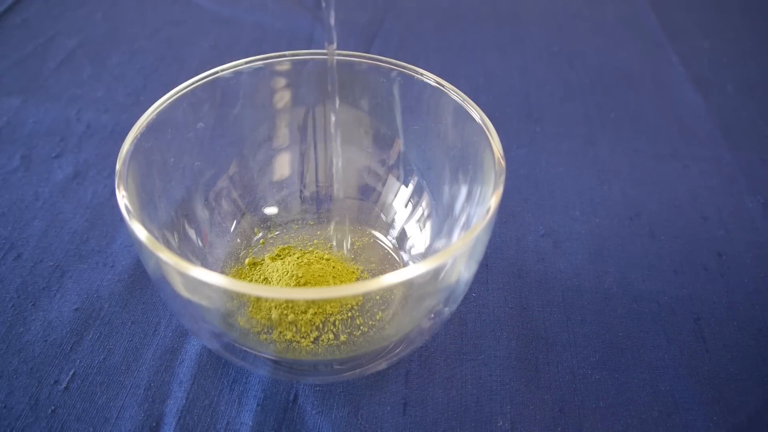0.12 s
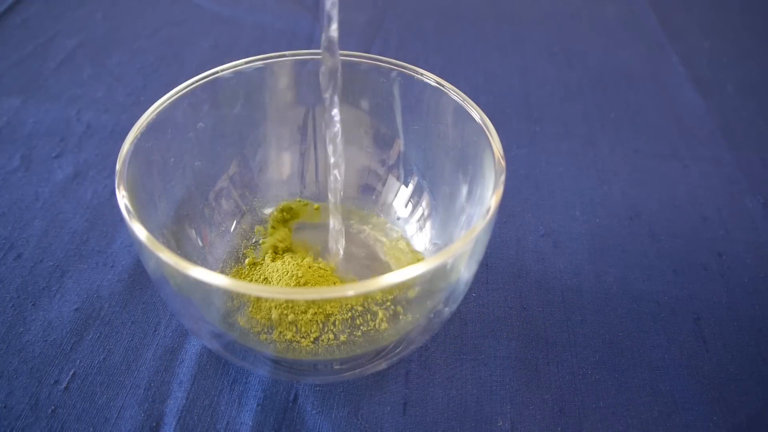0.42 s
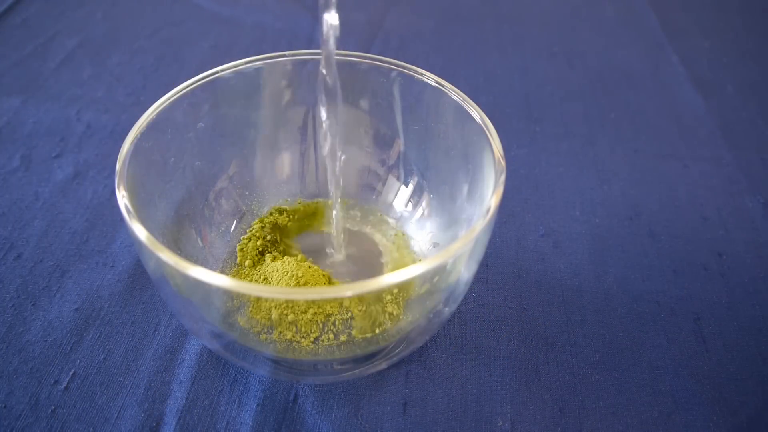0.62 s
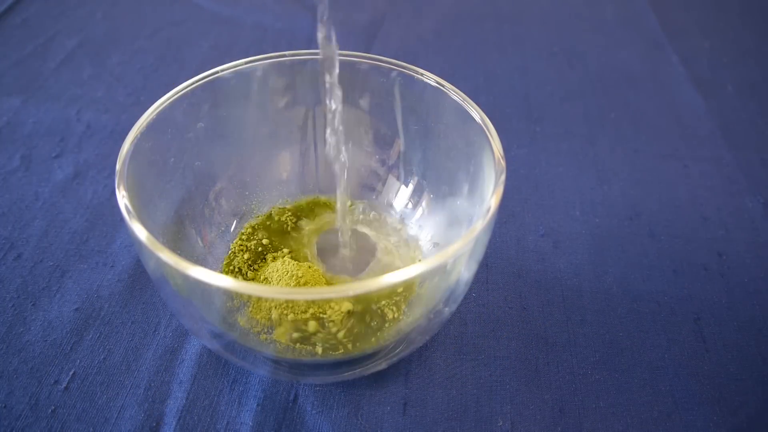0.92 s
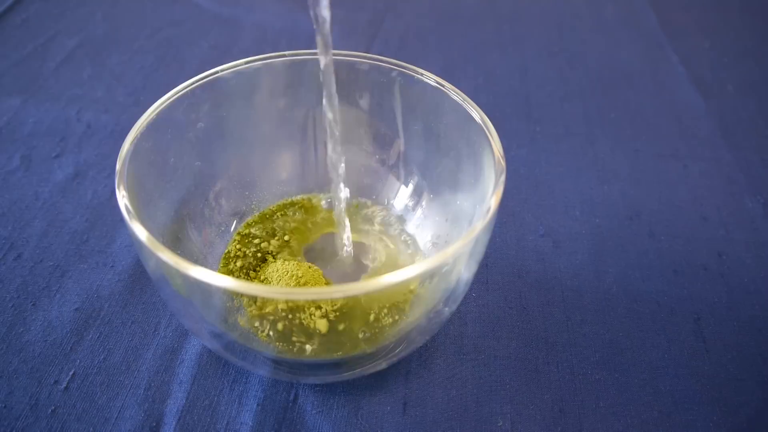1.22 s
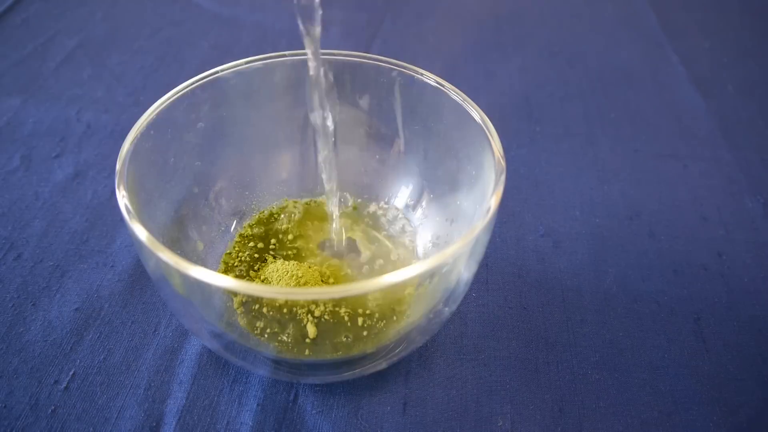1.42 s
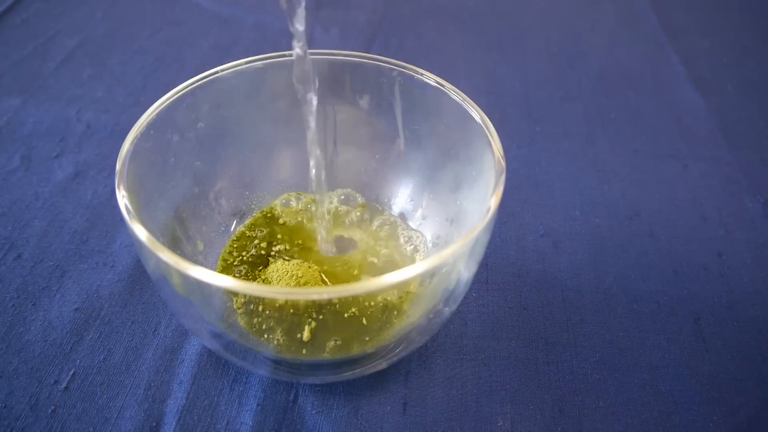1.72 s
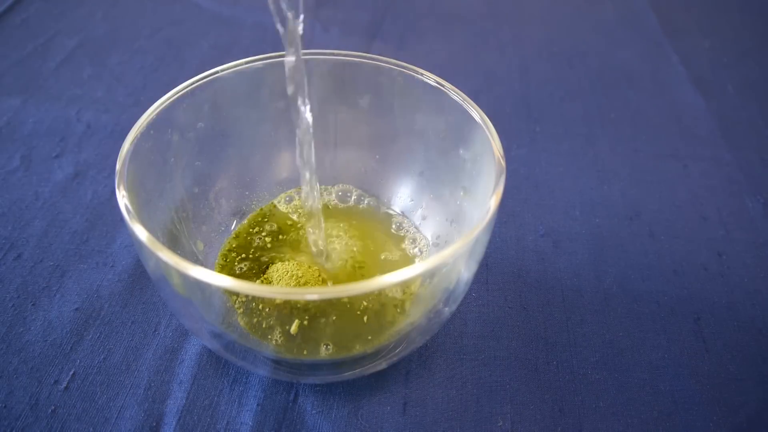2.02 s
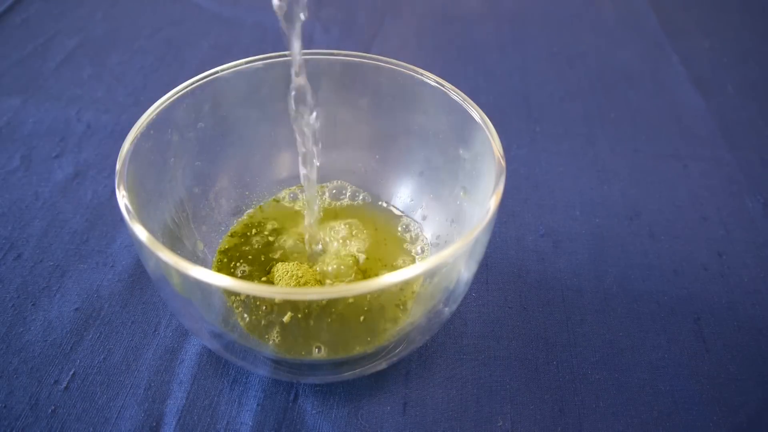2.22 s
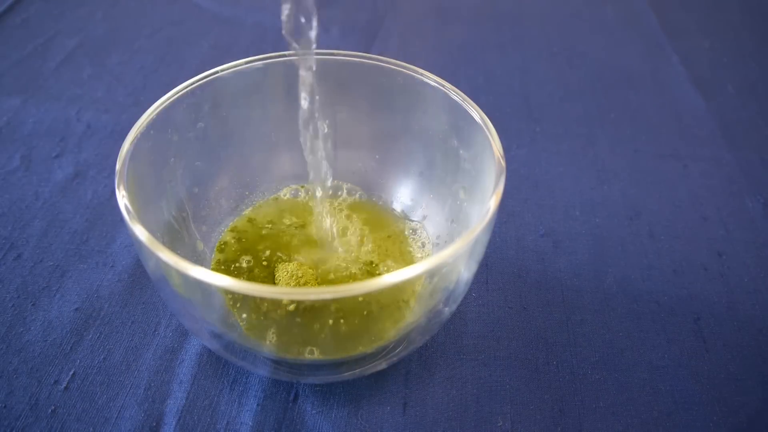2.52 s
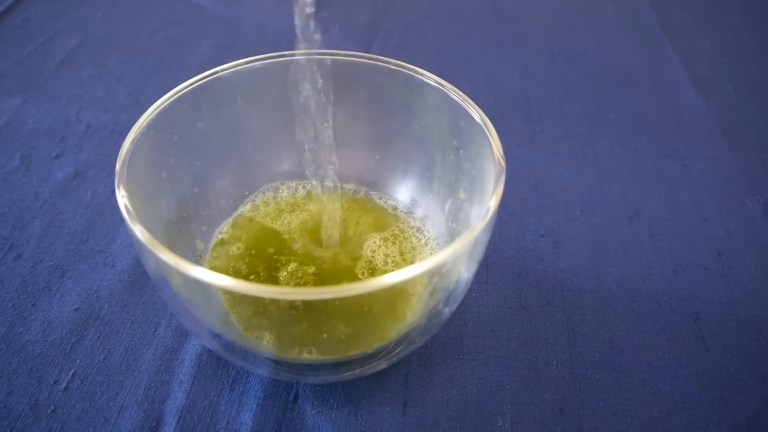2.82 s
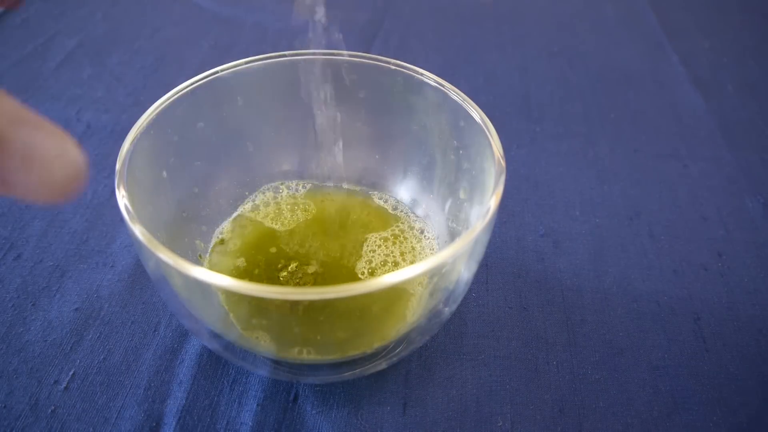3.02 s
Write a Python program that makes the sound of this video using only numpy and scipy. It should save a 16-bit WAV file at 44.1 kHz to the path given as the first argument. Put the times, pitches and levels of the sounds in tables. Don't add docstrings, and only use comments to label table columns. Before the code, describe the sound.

Close-up pouring of water into a glass bowl in a softly humming kitchen; bright glassy snaps dull into gurgles and rising bubble chirps as it fills, then it cuts off suddenly, leaving hum and a faint sleeve brush.

```python
import sys
import numpy as np
from scipy import signal
from scipy.fft import rfft, irfft, next_fast_len
from scipy.io import wavfile
from scipy.ndimage import uniform_filter1d, map_coordinates

SR = 44100
rng = np.random.default_rng(int(sys.argv[2]) if len(sys.argv) > 2 else 0)


def int16_out(signal):
    q = np.round(np.clip(np.atleast_2d(signal).T, -1, 1) * 32767)
    wavfile.write(sys.argv[1], SR, q.astype(np.int16))


def decibels_to_gain(level_db):
    exponent = np.asarray(level_db, float) / 20
    return 10 ** exponent


N = 141120
T = np.arange(N) / SR
START_S, CUT_S = .166, 2.927


def unit(x):
    return x / np.sqrt(np.mean(x ** 2) + 1e-20)


def along(points, hz):
    f, v = np.transpose(points)
    return np.interp(np.log(hz + 1), np.log(f + 1), v)


def wobble(rate):
    knots = rng.standard_normal(int(N * rate / SR) + 4)
    return map_coordinates(knots, [np.arange(N) * rate / SR])


def filtered(x, response):
    m = next_fast_len(N + 8192)
    return irfft(rfft(x, m) * response(np.fft.rfftfreq(m, 1 / SR)), m)[..., :N]


def resonate(x, modes):
    def response(f):
        return sum((-1) ** k * decibels_to_gain(db) * 1j * f * width / (hz * hz - f * f + 1j * f * width)
                   for k, (hz, width, db) in enumerate(modes))
    return filtered(x, response)


def grains(s, db, hz, cycles, rise, onset_s, crack, size):
    t = np.arange(size) / SR
    s, db, hz, cycles, rise = (np.reshape(v, (-1, 1)) for v in (s, db, hz, cycles, rise))
    age = t * hz / cycles
    noise = uniform_filter1d(rng.standard_normal((len(s), size)), size=4, axis=1)
    deepening = decibels_to_gain(0.5 * s)
    rough = crack * deepening * noise * decibels_to_gain(-60 * age * 2.4)
    sine = np.sin(2 * np.pi * hz * t * (1 + rise * np.minimum(age, 1.5)))
    wave = sine * (decibels_to_gain(-60 * age) + rough)
    wave = (1 - np.exp(-t / onset_s)) ** 2 * wave * (1 - (t / t[-1]) ** 4)
    wave = decibels_to_gain(db) * wave / np.abs(wave).max(axis=1, keepdims=True)
    at = np.round(s * SR).astype(int) + np.arange(size)
    return np.bincount(at.ravel(), wave.ravel(), N + size)[:N]


def swarm(crowd, count, hz, spread, cycles, rise, uneven_db, onset_s, crack, size):
    density = np.cumsum(crowd)
    u, z = rng.random((count, 2)), rng.standard_normal((count, 3))
    s = np.interp(u[:, 0], density / density[-1], T)
    db = uneven_db * np.clip(z[:, 2], -3, 1.7)
    pitch_hz = np.clip(hz * np.exp(spread * z[:, 0]), 950, 15500)
    lives = cycles * np.exp(0.17 * z[:, 1])
    return unit(grains(s, db, pitch_hz, lives, rise * u[:, 1], onset_s, crack, size))


# (frequency [Hz], level [dB])
ROOM_HUM = [(15, -41), (25, -17), (123, -6.5), (149, -5), (344, -8), (489, -11.5), (624, -15.5),
            (863, -20.5), (16000, -36.5)]


def kitchen():
    room_db, duck_db, duck_s = -45, -7, 0.74
    gain_db = duck_db * (1 - np.exp(-np.maximum(T - .8, 0) / duck_s)) * (T < CUT_S)
    hum = unit(filtered(rng.standard_normal(N), lambda f: decibels_to_gain(along(ROOM_HUM, f))))
    return decibels_to_gain(room_db + gain_db + .7 * wobble(13)) * hum


# (time [s], spray level [dB], trapped air level [dB], glass ring level [dB])
STREAM = [
    (.165, -43, -61, -1.5),
    (.5, -36.5, -43, -3),
    (1, -33.5, -66, -9),
    (1.5, -32.5, -35.5, -15),
    (2, -29, -32, -19),
    (2.5, -31.5, -30.5, -33),
    (2.92, -28, -30.5, -14),
]


def stream_levels():
    s, *columns = np.transpose(STREAM)
    return [np.interp(T, s, column) for column in columns]


# (time [s], peak level [dB], pitch [Hz])
DROP_SNAPS = [(0.1708, -14.5, 5470), (0.2156, -8.5, 8430), (0.2536, -10, 8800), (0.2794, 3, 8460),
              (0.2822, -6.5, 5500), (0.3013, -8.5, 5510), (0.3639, -11, 8890), (0.3801, -18, 13590),
              (0.3865, -4, 8700), (0.3935, -18, 13600), (0.4135, -17, 10470), (0.4324, -12.5, 10600),
              (0.4472, -16.5, 6600), (0.457, -14.5, 5500), (0.4695, -14.5, 11200),
              (0.4797, -13, 4800), (0.525, -17, 5200), (0.5677, -11.5, 8370), (0.5922, -11, 6550),
              (0.6176, -20, 9100), (0.6336, -17, 5100), (0.6407, -14.5, 8980), (0.6607, -6, 5080),
              (0.6645, -7.5, 8400), (0.6842, 0.5, 8740), (0.719, -2.5, 10600), (0.7382, -4, 10200),
              (0.777, -13, 4950), (0.7957, -8.0, 8000), (0.8, -9.5, 10300), (0.8203, -4.5, 10800),
              (0.8615, 4, 8000), (0.8821, -13, 7800), (0.8948, -4.5, 10570), (0.9274, -4, 13240),
              (0.97, -9.0, 12800), (0.9958, -3.5, 9360), (1.0057, -10, 9900), (1.013, -1.0, 5350),
              (1.0156, -0.5, 8620),
              (1.0395, -2, 7100), (1.0825, -5, 4570), (1.0933, -12, 12500), (1.1049, -8.5, 11200),
                 (1.1076, 1.5, 6540), (1.1244, -3.5, 8550), (1.171, -8.5, 9240), (1.1849, -1.0, 12600),
                 (1.1908, -15, 4460), (1.2058, -8, 8910), (1.2361, -7, 11300), (1.2398, -6.5, 8840),
                 (1.263, 0.0, 12840), (1.2864, -0.5, 9110), (1.3026, -6.5, 9130), (1.3523, -2.5, 9940),
                 (1.372, -11.5, 5170), (1.3926, -3.5, 9280), (1.4357, 0, 10490), (1.4429, -2.5, 10200),
                 (1.4528, -2, 6330), (1.4632, -5, 13110), (1.4666, -7, 10400), (1.4997, -4, 10810),
                 (1.5397, -4.5, 9000), (1.5429, -0.5, 8900), (1.5477, -5.5, 6200), (1.5925, -8.5, 9630),
                 (1.5992, -13.5, 9250), (1.6093, -9, 13600), (1.6286, 1.5, 12100), (1.6584, -20, 7760),
                 (1.7144, -10, 10100), (1.7257, 0.5, 10900), (1.729, -3, 10800), (1.7527, -5.5, 8630),
                 (1.7711, -10.5, 7040), (1.7796, 1.5, 9430), (1.8027, -6.5, 9200), (1.8639, 5.5, 12250),
                 (1.8697, -0.5, 9040), (1.9104, -0.5, 10540), (1.9217, -3, 9500), (1.9408, -4.5, 4470),
              (1.9688, -10, 4500), (1.974, -10.5, 6570), (1.9832, -6.0, 8480), (2.0009, -10, 7950),
                (2.0196, -5, 8060), (2.0265, -4.0, 8850), (2.1005, -2, 9350), (2.1343, 0.5, 8600),
                (2.1527, -4, 13590), (2.2003, -1, 6570), (2.218, -6.5, 5970), (2.2719, -6.5, 6200),
                (2.2844, -4.5, 7900), (2.3194, -7.5, 7000), (2.3228, -3, 8330), (2.3292, -0.5, 8980),
                (2.3846, -5, 8530), (2.4339, -2, 8000), (2.4646, -10.5, 11180), (2.468, -12, 6650),
                (2.4721, -5.0, 7900), (2.509, 3, 8980), (2.5168, -5, 6890), (2.5222, -8.5, 9650),
                (2.5259, -3, 9220), (2.5363, -2, 9500), (2.5516, 0.5, 10300), (2.6462, -2, 8700),
                (2.6585, -11, 6120), (2.6683, -11, 7520), (2.6846, -9.5, 6140), (2.6887, -2, 8750),
                (2.7056, -6.5, 5010), (2.7516, -7, 9840), (2.7647, -10.0, 7040), (2.7717, -7, 8030),
                (2.7972, -3, 9400), (2.8123, -2.5, 7200), (2.8395, -4, 8750), (2.8595, -6, 7750),
                (2.872, -5.5, 14900), (2.9163, -4.5, 8400)]


def large_drops():
    s, db, hz = np.array(DROP_SNAPS).T
    z = rng.standard_normal((len(s), 2))
    cycles, rise = 32 * np.exp(0.35 * z[:, 0]), 0.021 + 0.131 * z[:, 1]
    snaps = grains(s + 0.00048, db + 2.5, hz, cycles, rise, onset_s=0.000085, crack=2.37, size=400)
    return s, filtered(snaps, lambda f: f ** 2 / (f ** 2 + 2600 ** 2))


def droplet_crowd(drop_s):
    splash_s = .003
    coarse = T[None, ::44]
    since = coarse - drop_s[:, None]
    near = (np.exp(-np.abs(since - .002) / splash_s) * (since > 0)).sum(axis=0)
    share = np.clip(.6 - .13 * T, 0, 1)
    loose = .3 + decibels_to_gain(4 * wobble(90))
    return share * np.interp(T, T[::44], near / near.mean()) + (1 - share) * loose


def droplets(crowd):
    return swarm(crowd, count=2600, hz=8890, spread=0.379, cycles=17.6, rise=0.14, uneven_db=5.0,
                 onset_s=0.00005, crack=2.3, size=200)


# (frequency [Hz], level [dB])
BOWL_COLOUR = [(600, 1.5), (2400, -8), (5300, -5.5), (8800, 3), (13000, 0.5), (16000, -2)]


def knocking_water(snaps, spray, crowd, spray_db):
    hiss = unit(filtered(rng.standard_normal(N), lambda f: 1 / (1 + (f / 10000) ** 4)))
    hiss = decibels_to_gain(-22.5) * crowd ** 0.31 * hiss
    knocks = snaps + filtered(decibels_to_gain(spray_db) * (spray + hiss), lambda f: decibels_to_gain(along(BOWL_COLOUR, f)))
    dull = filtered(knocks, lambda f: 1 / (1 + (f / 11500) ** 6))
    return knocks + 0.18 * T * (dull - knocks)


# (frequency [Hz], width [Hz], level [dB])
GLASS_NOTES = [(866, 87, 13.5), (2820, 250, 8.5), (5450, 120, 6), (8600, 220, 3.5), (11200, 560, -1.5)]


def glass_ring(knocks, ring_db):
    rough = 0.31 * np.sqrt(np.abs(knocks)) * rng.standard_normal(N)
    return resonate(decibels_to_gain(ring_db) * (knocks + rough), GLASS_NOTES)


# (frequency [Hz], width [Hz], level [dB])
FOAM_NOTES = [(815, 59, -10), (1370, 280, -4.5), (3105, 620, -11.5), (3710, 170, 0.5)]


def trapped_air(crowd, spray, air_db):
    foam_s, foam_db = 2.1, 5
    gurgle = swarm(crowd ** .6, count=2600, hz=2290, spread=0.44, cycles=12.2, rise=0.17, uneven_db=4.0,
                   onset_s=0.0001, crack=0.92, size=700)
    foam = unit(resonate(gurgle + 2.0 * spray, FOAM_NOTES))
    froth = decibels_to_gain(air_db) * (decibels_to_gain(-4.5) * gurgle + foam)
    low = filtered(froth, lambda f: 1 / (1 + (f / 1500) ** 6))
    return froth + (decibels_to_gain(foam_db * (T > foam_s)) - 1.4) * low


def bowl_echo(water):
    walls_db, walls_t60_s = -9.5, 0.015
    echo = rng.standard_normal(2000) * decibels_to_gain(-60 * T[:2000] / walls_t60_s)
    return decibels_to_gain(walls_db) * signal.fftconvolve(water, echo / np.linalg.norm(echo))[:N]


def air_thump():
    thump_s, thump_db = .2795, -17.5
    return decibels_to_gain(thump_db) * np.exp(-((T - thump_s) / 0.00036) ** 2)


# (time [s], peak level [dB], pitch [Hz])
FROTH_GULPS = [(0.6963, -24, 2690), (0.8603, -6, 3700), (1.7496, -11, 3120), (1.8315, -6, 3600),
               (1.9695, -10, 4260), (2.135, -6.0, 4290), (2.1669, -10, 3060), (2.193, -13.5, 1800),
               (2.366, -9.5, 1160), (2.4023, -11.5, 1210), (2.4335, -11.5, 2070), (2.4679, -10, 1790),
               (2.4766, -18, 1410), (2.5063, -8.5, 2840), (2.522, -11, 3000), (2.633, -10.5, 3620),
               (2.7054, -8, 3290), (2.7464, -5, 3580), (2.762, -13.5, 1470)]


def gulps():
    s, db, hz = np.transpose(FROTH_GULPS)
    return grains(s + .0004, db + 0.47, .97 * hz, 17.4, 0.096, onset_s=0.00011, crack=1.83, size=900)


def chirps(crowd):
    return swarm(crowd * (T > .7), count=260, hz=3200, spread=0.322, cycles=30, rise=0.37, uneven_db=4.5,
                 onset_s=0.00012, crack=0.76, size=900)


# (time [s], peak level [dB], pitch [Hz])
LARGE_BUBBLES = [(0.773, -16.5, 1380), (1.04, -14, 1840), (1.095, -18, 1360), (1.148, -7.5, 2190),
                 (1.274, -22, 1620), (1.44, -13.5, 1536), (1.486, -20, 1370), (1.5, -7, 1775),
                 (1.534, -11, 1460), (1.599, -10.5, 992), (1.658, -4, 1580), (1.771, -3, 1453),
                 (1.983, -4, 1575), (2.177, -7.5, 1750), (2.272, -13.5, 964), (2.299, -7, 1590),
                 (2.449, -5.5, 1760), (2.663, -10, 1330), (2.771, -8, 1370), (2.795, -1, 1280),
                 (2.92, -9.5, 1370)]
# (time [s], peak level [dB], pitch [Hz])
SMALL_BUBBLES = [(0.7295, -16.5, 2950), (0.754, -13.5, 3800), (0.799, -21, 2130), (0.8963, -12.5, 3050),
                 (1.1256, -9, 3660), (1.1381, -10, 2670), (1.1692, -8.5, 3570), (1.1913, -11.5, 4280),
                 (1.239, -14.5, 3200), (1.3039, -22, 2690), (1.4655, -14.5, 2110), (1.4427, -6.5, 3900),
                 (1.5477, -5.5, 3560), (1.6105, -1.5, 3318), (1.9104, -6.5, 2770), (1.9408, 5, 3720),
                 (2.022, -2.5, 3040), (2.0557, -5, 3710), (2.1263, -4, 3940), (2.2854, -3, 3660)]


def bubbles():
    s, db, hz = np.concatenate([LARGE_BUBBLES, SMALL_BUBBLES]).T
    u = rng.random((len(s), 2))
    cycles, rise = (38 + 16 * u[:, 0]) * (1 - .19 * s), .1 + .22 * u[:, 1]
    return grains(s + .0003, db - 2, .94 * hz, cycles, rise, onset_s=.0003, crack=1.6, size=1500)


def pour():
    spray_db, air_db, ring_db = stream_levels()
    drop_s, snaps = large_drops()
    crowd = droplet_crowd(drop_s)
    spray = droplets(crowd)
    knocks = knocking_water(snaps, spray, crowd, spray_db)
    ring = glass_ring(knocks, ring_db)
    water = knocks + trapped_air(crowd, spray, air_db)
    water = water + bowl_echo(water)
    water = water + gulps() + decibels_to_gain(spray_db - 6.5) * chirps(crowd) + bubbles() + ring
    water = filtered(water, lambda f: 1 - 1 / (1 + (f / 520) ** 4))
    return (water + air_thump()) * np.clip((T - START_S) / 0.0026, 0, 1) * (T < CUT_S)


# (time [s], level [dB], centre [Hz], half length [s])
CLOTH_BRUSHES = [
    (3.127, -50.5, 7550, 0.039),
    (3.198, -49.5, 8000, 0.028),
]


def sleeve():
    total = np.zeros(N)
    for s, db, hz, half_s in CLOTH_BRUSHES:
        cloth = unit(filtered(rng.standard_normal(N), lambda f: 1 / (1 + ((f - hz) / (0.21 * hz)) ** 2)))
        total += decibels_to_gain(db + 1.4 * wobble(90)) * np.exp(-((T - s) / half_s) ** 2) * cloth
    return total


def scene():
    side_db = -25.5
    mid = kitchen() + pour() + sleeve()
    drift = unit(filtered(rng.standard_normal(N), lambda f: f < 300))
    side = decibels_to_gain(side_db) * filtered(mid * drift, lambda f: (f > 2000) * f / (f + 5000))
    return np.array([mid + side, mid - side])


def low_pass(x):
    return signal.sosfilt(signal.butter(12, 16720, fs=SR, output="sos"), x)


def record(dry):
    limited = dry / (1 + np.abs(dry) ** 16) ** (1 / 16)
    mix = filtered(limited, lambda f: np.clip((16800 - f) / 700, 0, 1))
    return low_pass(mix)


dry = scene()
out = record(dry)
int16_out(out)
```